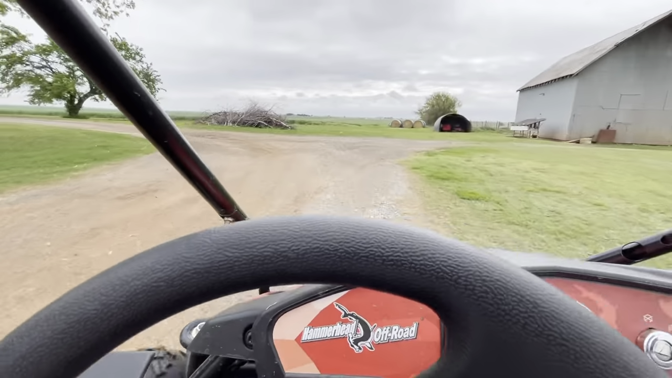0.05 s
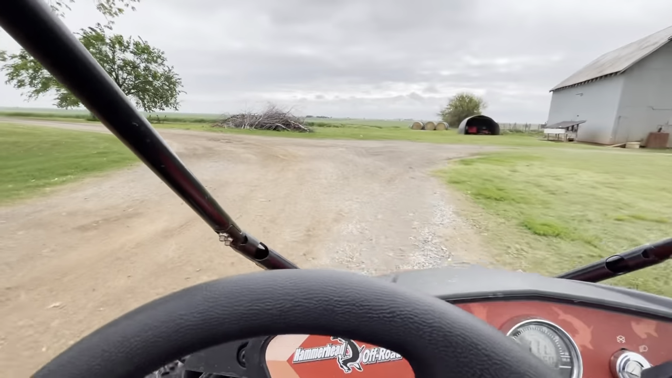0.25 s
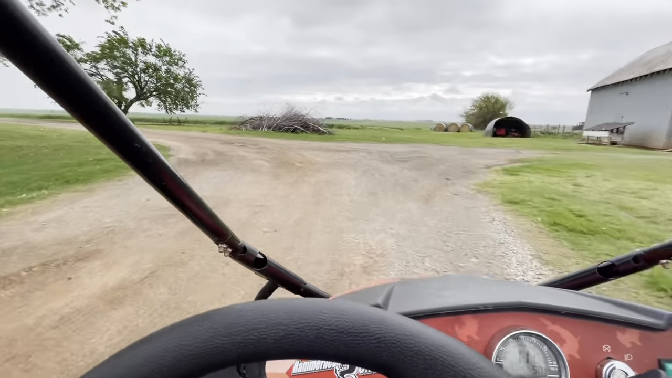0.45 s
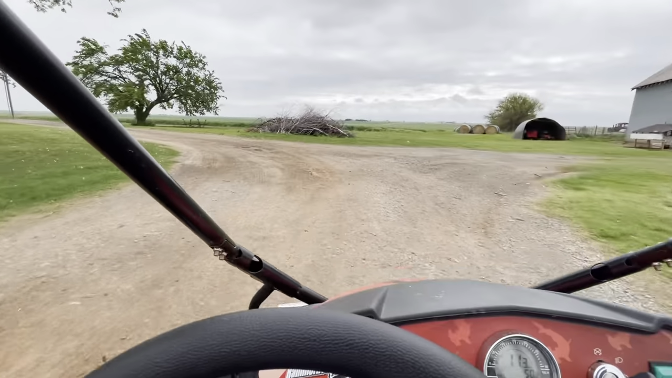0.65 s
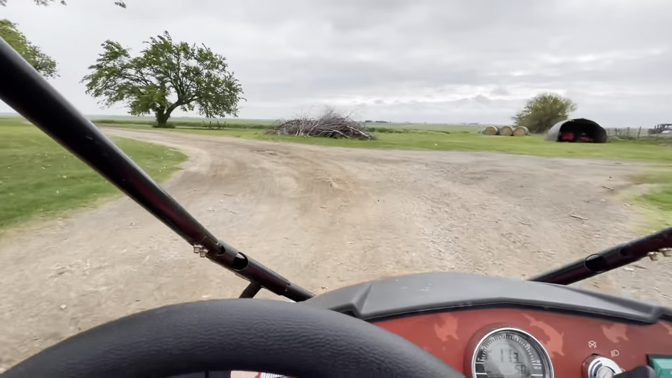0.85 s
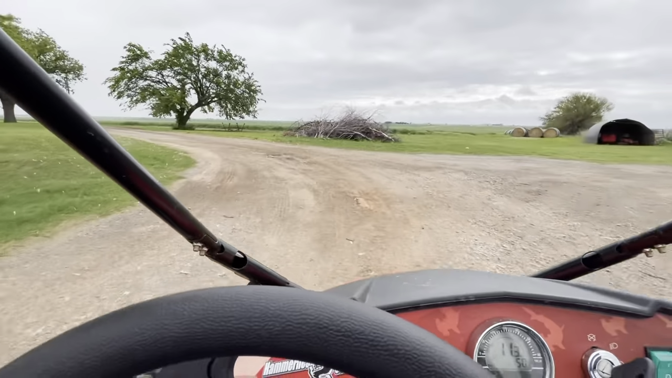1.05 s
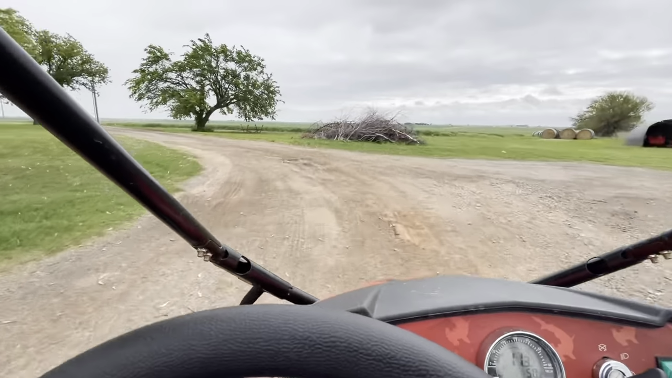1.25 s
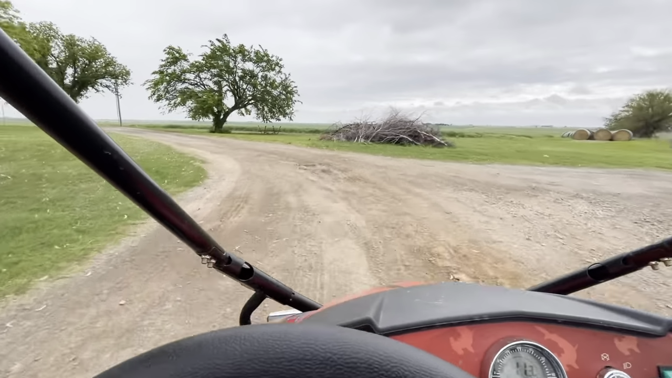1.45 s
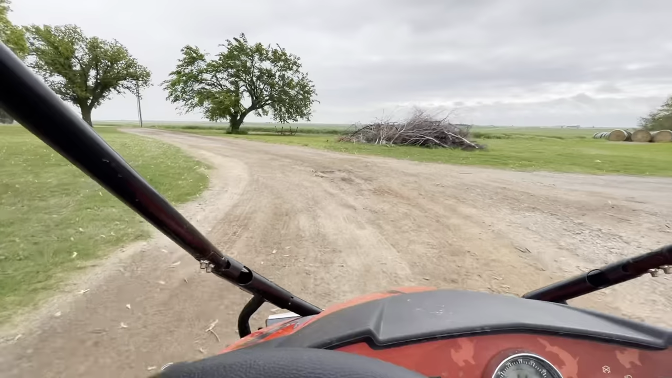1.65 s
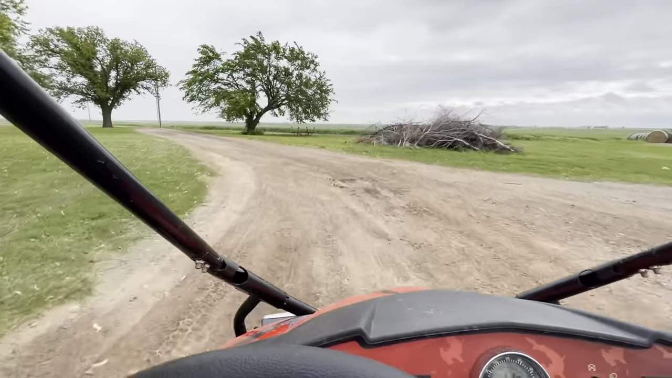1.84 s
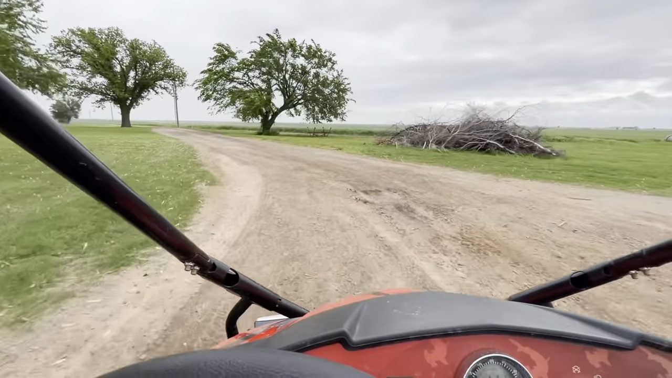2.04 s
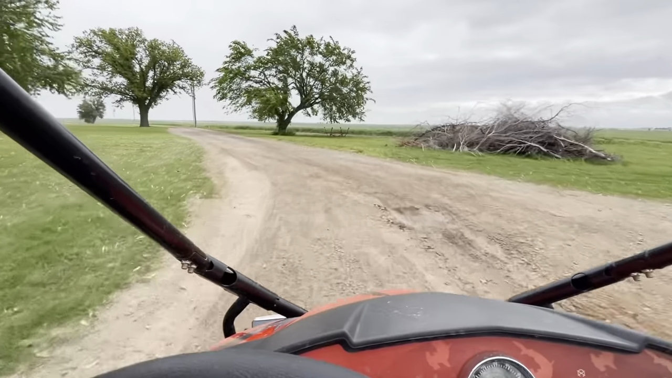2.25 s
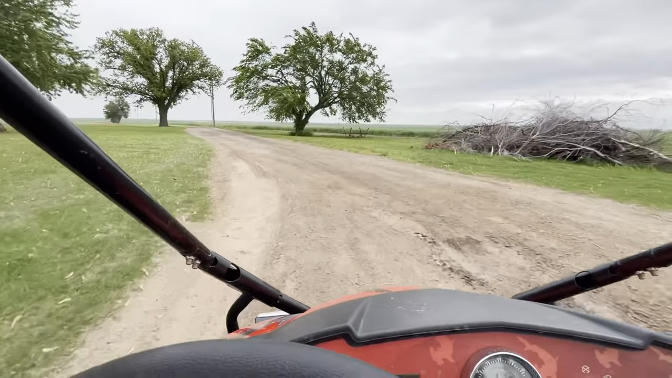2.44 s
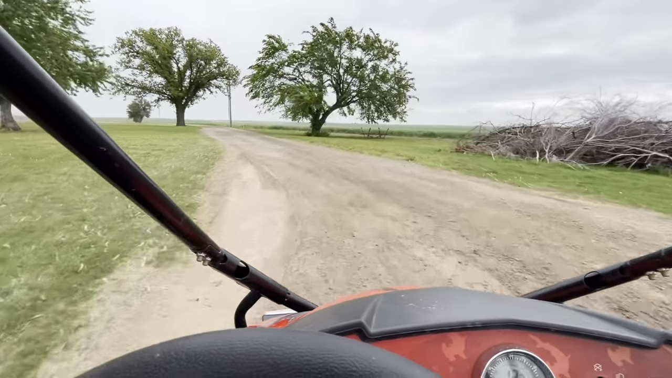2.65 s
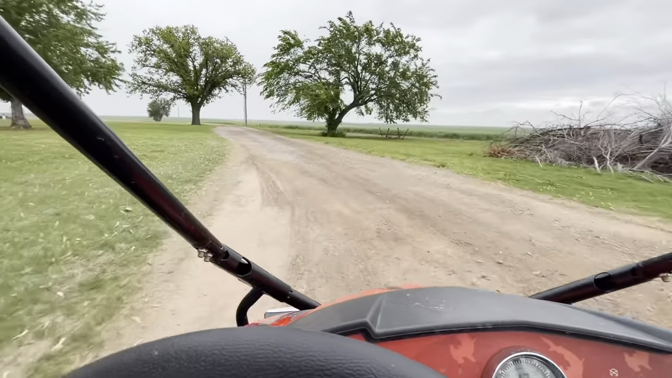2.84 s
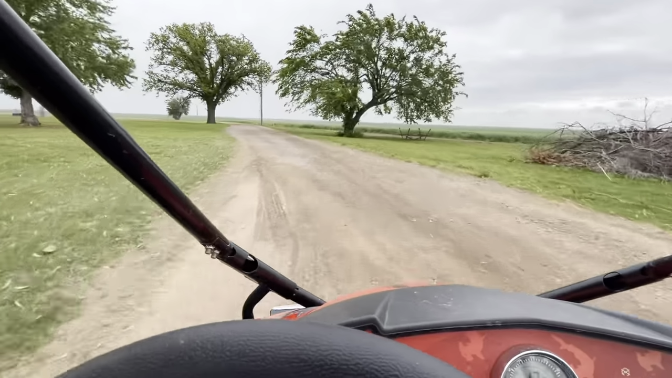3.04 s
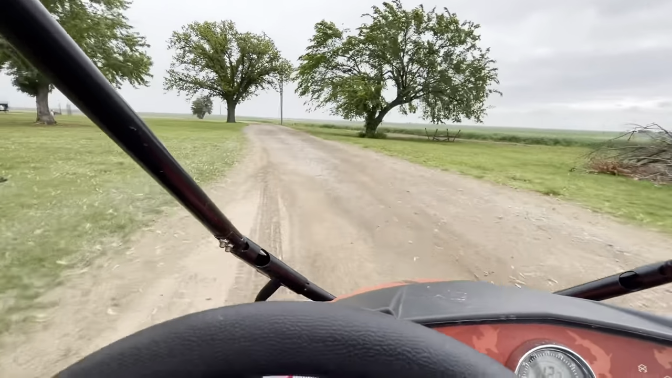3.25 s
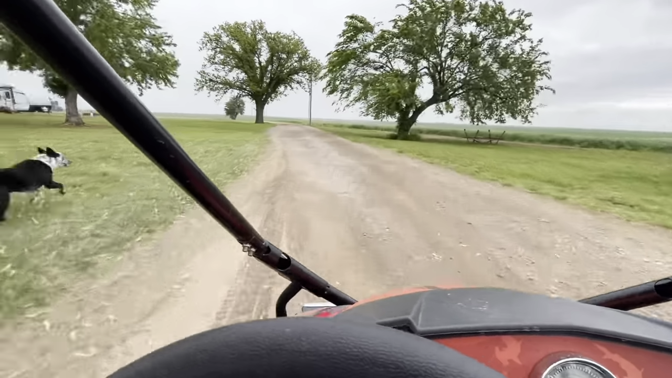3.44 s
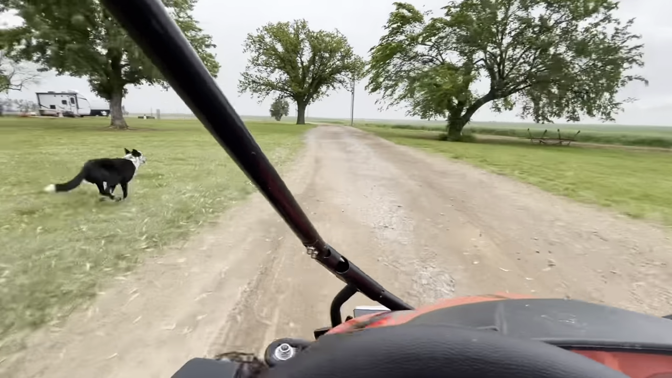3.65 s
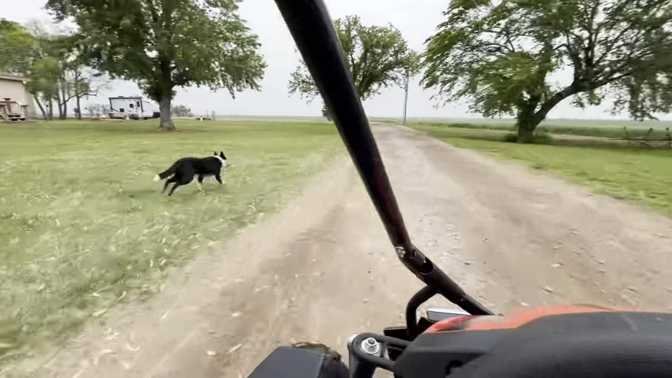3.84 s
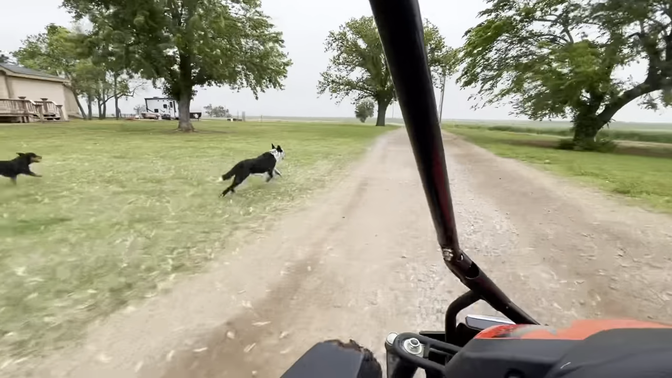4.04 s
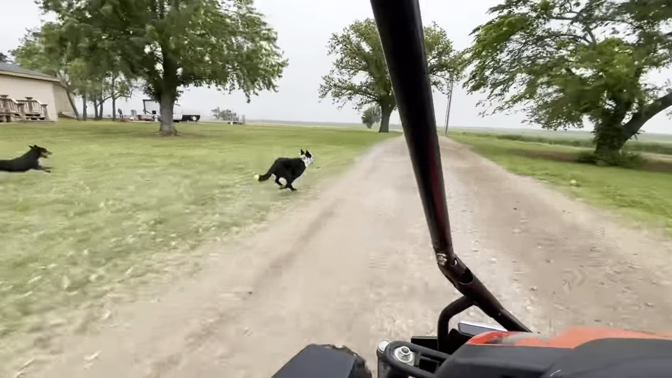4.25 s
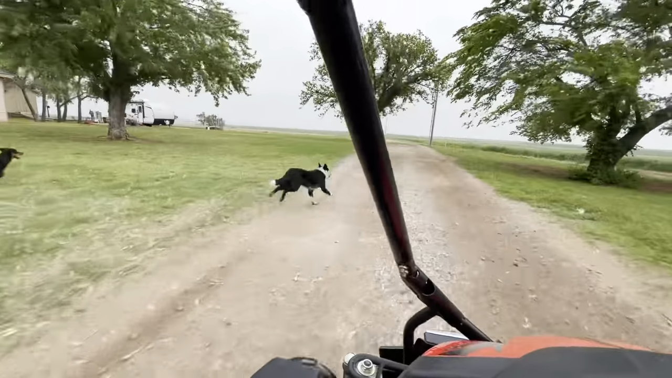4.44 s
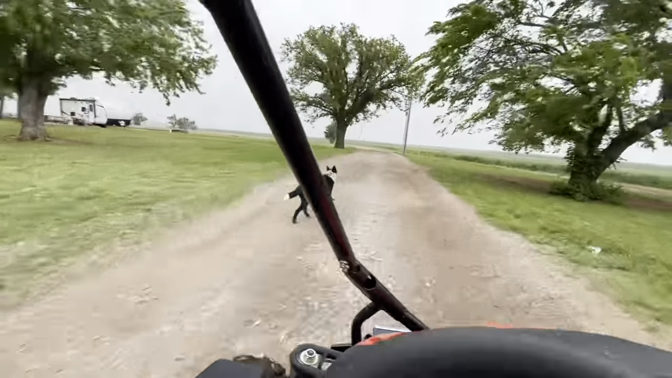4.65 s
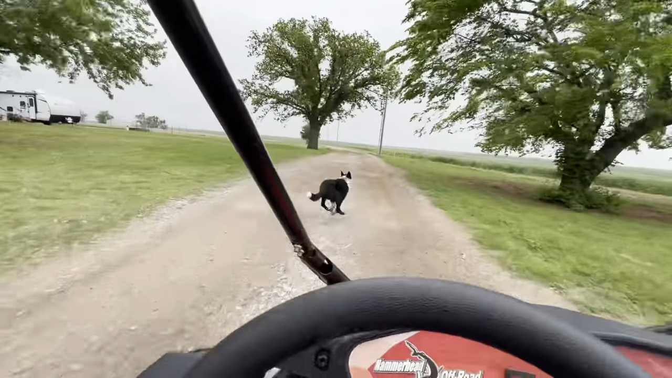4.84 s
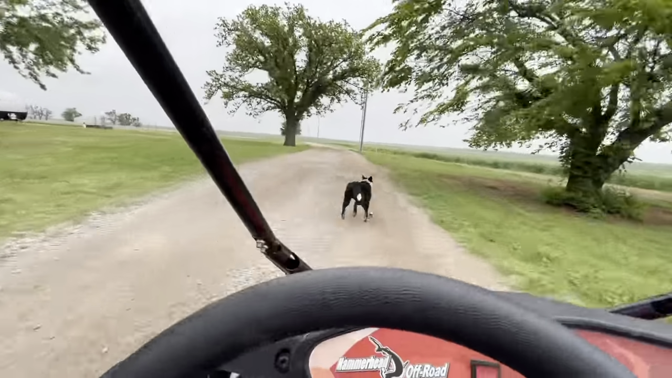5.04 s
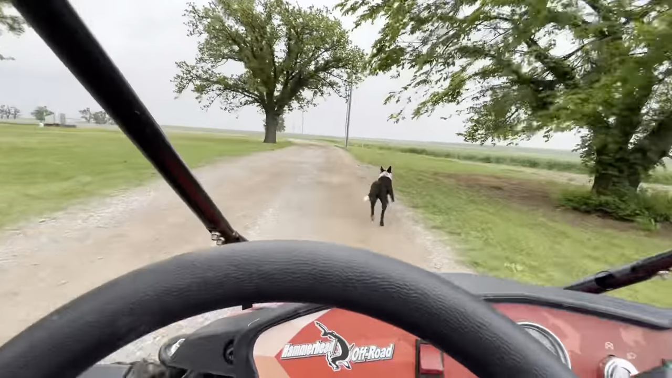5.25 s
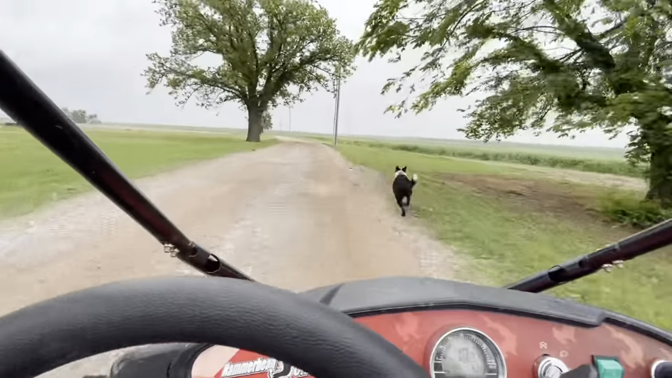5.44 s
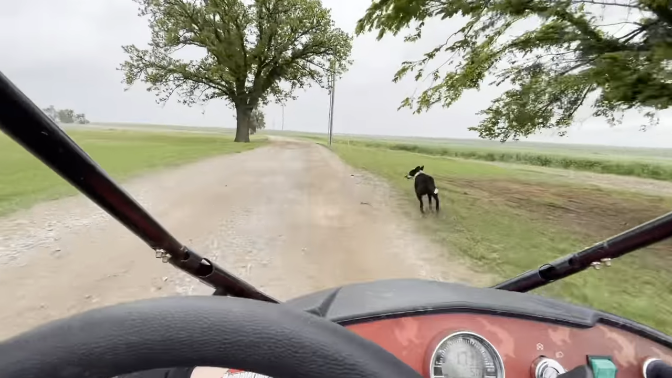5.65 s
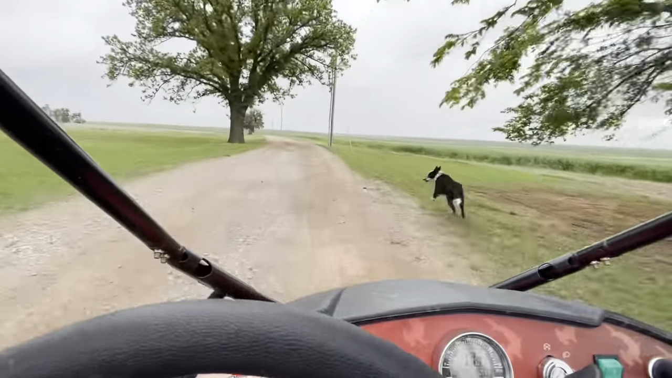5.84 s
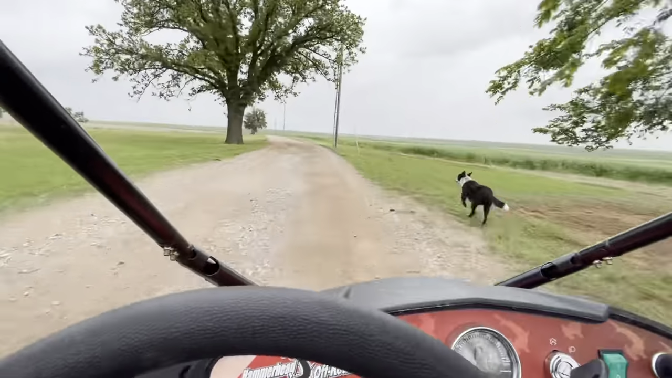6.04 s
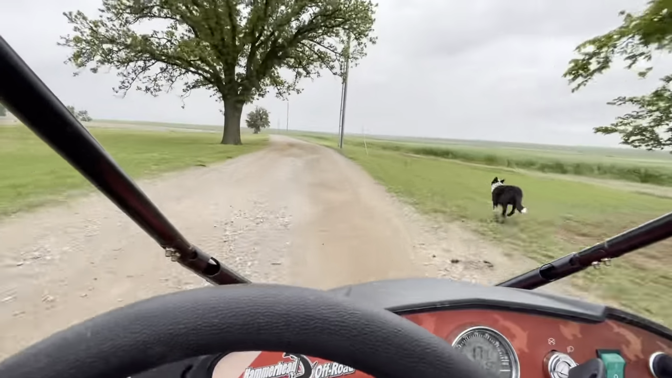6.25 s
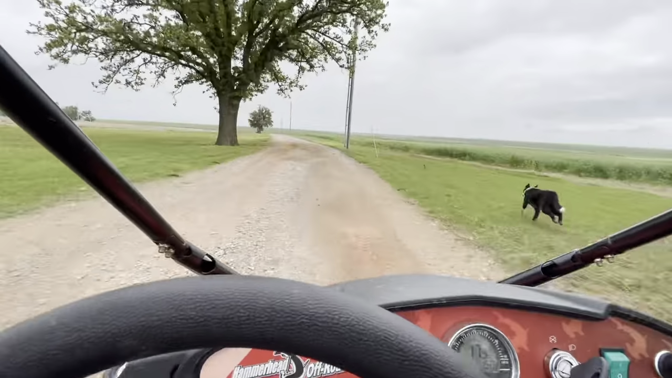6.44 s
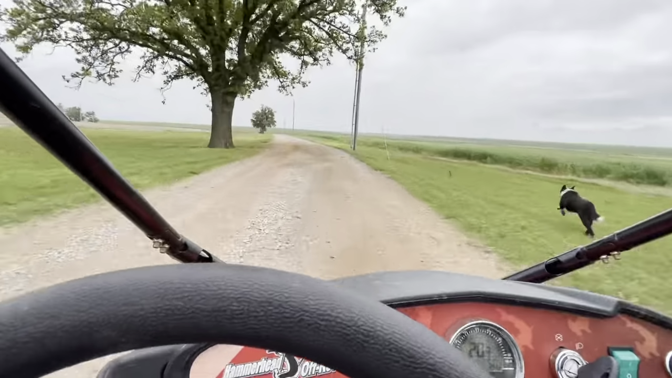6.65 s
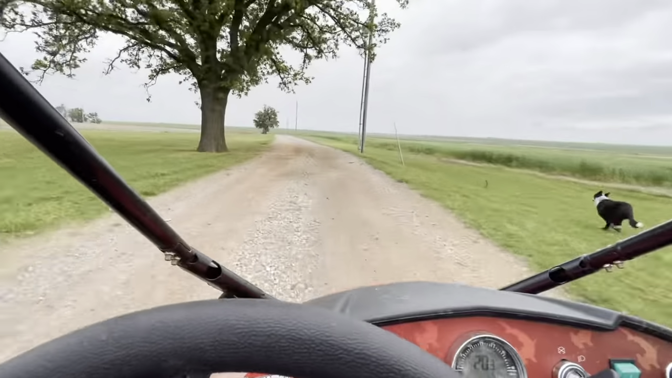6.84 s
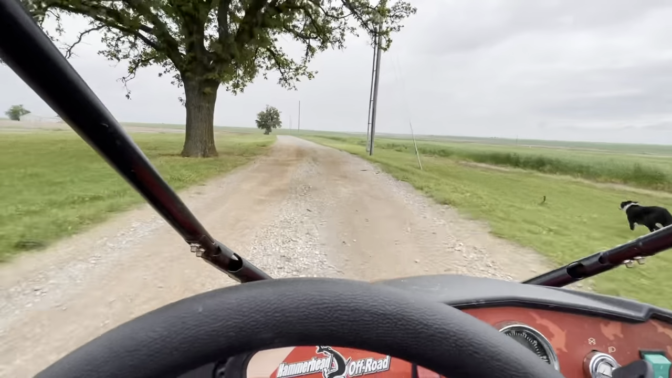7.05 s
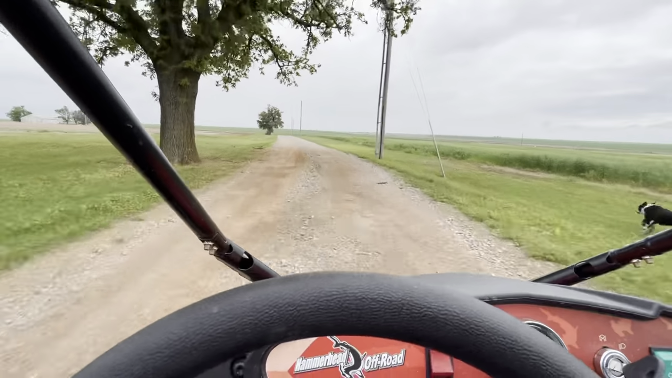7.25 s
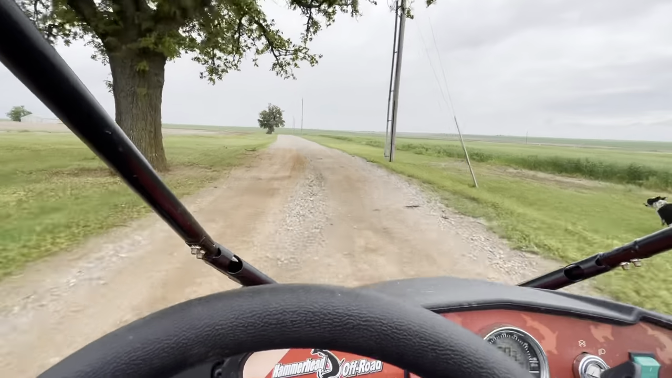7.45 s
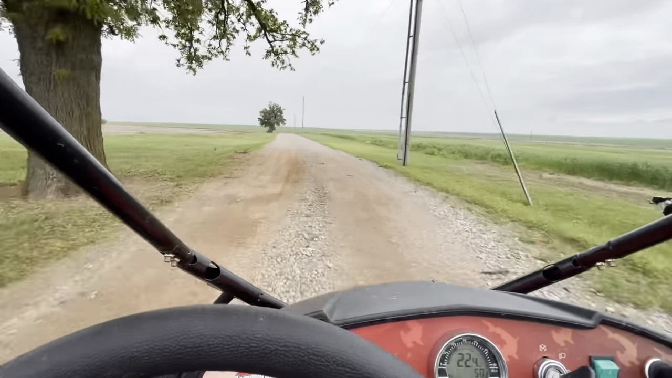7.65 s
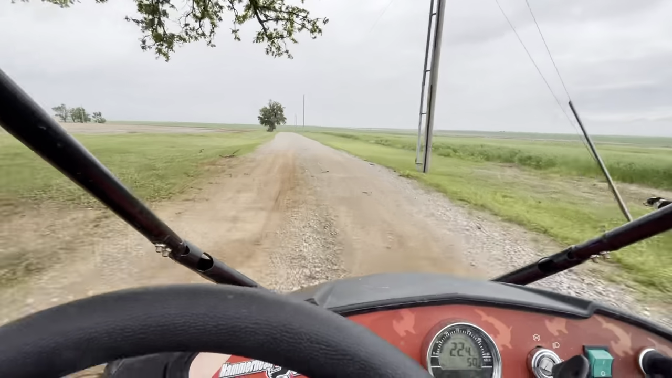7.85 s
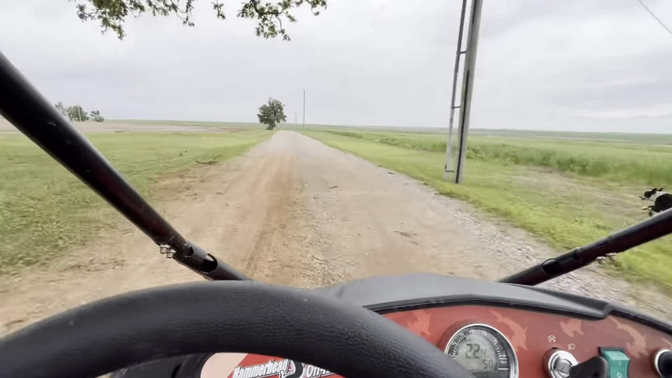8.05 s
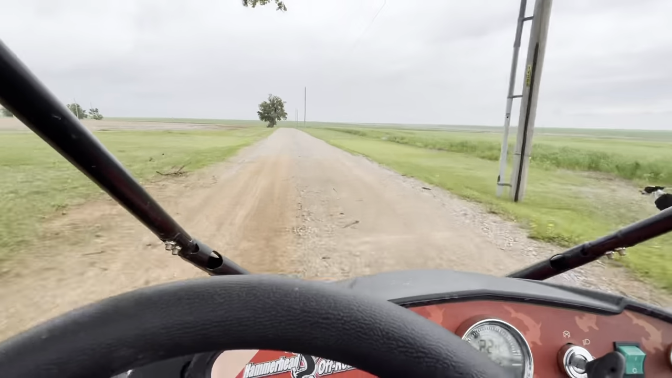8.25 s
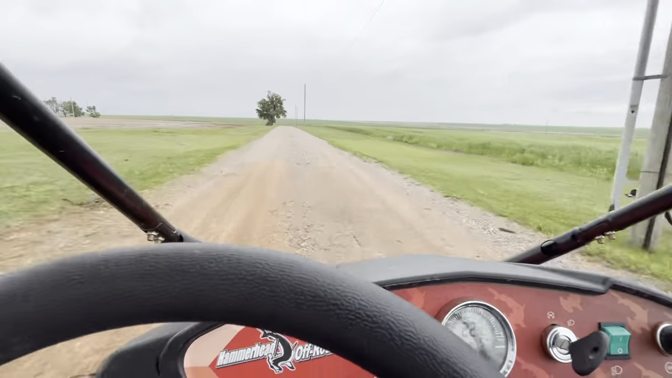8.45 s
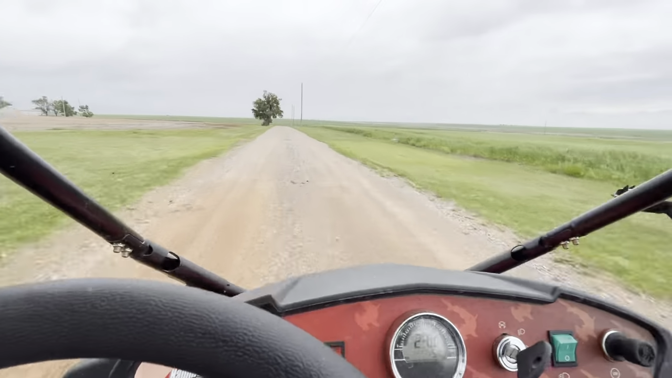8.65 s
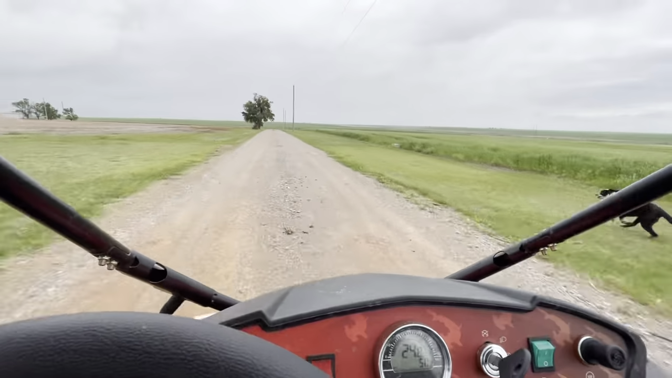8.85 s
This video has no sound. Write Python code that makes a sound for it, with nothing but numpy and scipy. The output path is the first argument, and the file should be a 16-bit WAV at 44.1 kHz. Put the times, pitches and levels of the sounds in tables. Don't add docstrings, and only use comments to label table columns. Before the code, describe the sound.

From the seat of a small open kart on a gravel farm road, a single-cylinder engine putters low, then pulls harder with a raspy, boomy exhaust. It drops off briefly midway, picks up again and holds a steady drone. Tyres crunch densely over stones, wind thumps and flutters on a hand-held phone's two ports, and loose metal knocks and jingles on bumps.

```python
import sys
import numpy as np
from scipy import signal
from scipy.fft import rfft, irfft, next_fast_len
from scipy.io import wavfile
from scipy.ndimage import uniform_filter1d

SR = 44100
rng = np.random.default_rng(int(sys.argv[2]) if len(sys.argv) > 2 else 0)


def field_ratio(decibels):
    return 10 ** (np.asarray(decibels, dtype=float) / 20)


def to_wav(sig):
    pcm = np.clip(np.atleast_2d(sig), -1, 1) * 32767
    pcm = np.round(pcm).astype(np.int16)
    wavfile.write(sys.argv[1], SR, pcm.T)


N = 392490
STEP = 64
FULL_DB = -11

# (t/s, firings per second/Hz, throttle as exhaust boom/dB, load as bark/dB)
DRIVE = [(0, 46.6, -23.5, -22.5), (1.7, 42.3, -23.5, -20.5), (2.3, 46.2, -19.5, -24),
         (2.69, 47.8, -10, -14), (2.9, 54, -10, -7.5), (3.18, 55.3, -9.5, -9), (3.6, 57, -11, -7.5),
         (4.16, 57.6, -12, -15.5), (4.47, 59.7, -16.5, -18), (4.72, 49.7, -29.5, -17.5),
         (4.98, 41, -34.5, -34.5), (5.2, 43.6, -20, -31), (5.48, 49.4, -8.5, -11.5), (5.68, 54.7, -11, -12),
         (6.2, 57, -12, -9.5), (6.75, 57.7, -13.5, -11), (7.65, 57, -13, -9.5), (8.9, 57.1, -13.5, -12)]


def rms_one(x):
    return x / np.sqrt(np.mean(x ** 2) + 1e-20)


def in_time(rows):
    s, *columns = np.transpose(rows)
    return [np.interp(np.arange(N) / SR, s, column) for column in columns]


def at_hz(points, hz):
    point_hz, point_db = np.transpose(points)
    return np.interp(np.log(hz), np.log(point_hz), point_db)


def fill(slow):
    ramp = np.arange(STEP) / STEP
    rise = np.diff(slow, append=slow[-1])
    return (slow[:, None] + rise[:, None] * ramp).ravel()[:N]


def drift(rate_hz):
    r = np.exp(-2 * np.pi * rate_hz * STEP / SR)
    chance = rng.standard_normal(N // STEP + 1001)
    settled = signal.lfilter([1], [1, -2 * r, r * r], chance)[1000:]
    return rms_one(settled)


def band(x, low_hz, high_hz):
    edges_hz = [low_hz, min(high_hz, .45 * SR)]
    return signal.sosfilt(signal.butter(2, edges_hz, "band", fs=SR, output="sos"), x)


def at_ports(x):
    # (f/Hz, left port ahead/rad)
    left_phase = [(0, 0), (520, -0.7), (1290, -0.6), (1550, -2.1), (2330, -2.3), (3100, -5.4), (3790, -6.4),
                  (6890, -13.0), (7490, -12.9), (8180, -15.5), (9730, -21.9), (10600, -22.0),
                  (11700, -25.0), (12400, -25.2)]
    size = next_fast_len(N)
    hz = np.arange(size // 2 + 1) * SR / size
    turn = np.exp(1j * np.interp(hz, *np.transpose(left_phase)))
    left = irfft(rfft(x[0], size) * turn, size)[:N]
    return np.array([left, x[1]])


def colour(spectrum, x, weight):
    # (f/Hz, width/Hz, lift/dB)
    panels = [(1027, 55, 4.5), (1636, 24, 4.5), (2177, 30, 5), (3004, 38, 3), (8230, 360, 6.5)]
    # (f/Hz, level/dB)
    balance = [(60, 5), (150, -7), (350, 0), (860, 0), (2080, 0.5), (5050, 8), (12200, 1.5)]
    # (f/Hz, share 0 to 1)
    likeness = [(100, .8), (400, .4), (1000, .6), (2500, .3), (5000, .25), (8500, .45), (9500, .95),
                (10700, .94), (11500, .8)]
    size = next_fast_len(N)
    hz = np.maximum(np.arange(size // 2 + 1) * SR / size, 10)
    panels_db = sum(db * np.exp(-((hz - centre_hz) / width) ** 2) for centre_hz, width, db in panels)
    tilt_db = at_hz(balance, hz) / 2 * np.array([[1], [-1]])
    alike = np.clip(at_hz(likeness, hz), 0, 1)
    gain = field_ratio(at_hz(spectrum, hz) + panels_db + tilt_db) * weight(alike)
    return irfft(rfft(x, size) * gain, size)[:, :N]


def wide_noise(spectrum, noise):
    shared = colour(spectrum, noise[0], np.sqrt)
    own = colour(spectrum, noise[1:], lambda alike: np.sqrt(1 - alike))
    return rms_one(at_ports(shared) + own)


def exhaust(cycle, rate, boom_db, bark_db):
    # (multiple of the firing rate, left level/dB, right level/dB, left port ahead/rad)
    orders = [(1, -15, -15, -0.1), (2, -2, 2, -0.2), (3, -17, -15, 0.4), (4, -15, -13, 0.5),
              (5, -24, -20, 0.2), (6, -22, -13, -0.1), (7, -20, -17, -0.1), (8, -22, -20, -1.6),
              (9, -21, -25, -1.1), (10, -32, -24, -1.7), (11, -24, -25, -0.9), (12, -24, -22, 0.3),
              (13, -24, -30, 1.5), (14, -25, -32, -2.8), (15, -25, -29, 2.8), (16, -30, -24, 0.1),
              (17, -20, -26, 0.8), (18, -28, -26, 0.2), (19, -26, -26, -0.8), (20, -26, -23, -1.2),
              (21, -30, -25, -0.3), (22, -27, -25, -0.3), (23, -28, -27, -0.8), (24, -31, -31, 1.0)]
    # (f/Hz, width/Hz, left lift/dB, right lift/dB)
    resonances = [(139.6, 23, 13, 9), (198.4, 15, -14, -24), (262, 14, 14.5, 7), (332.6, 10.7, 3, 7),
                  (393.8, 3.7, 9.5, 7.5), (469, 7.8, 9, 5), (522, 18, 4, 4), (639, 8, 4, 3.5),
                  (840, 11, 3, 2), (1246, 25, 1, 6)]
    t = np.arange(0, N, STEP) / SR
    thump_db = -32.5 + 0.61 * (boom_db - FULL_DB) + 0.95 * t + 2 * drift(3.0)
    firing_change = rng.standard_normal(N // STEP)[cycle[::STEP].astype(int)]
    uneven_db = 2 * uniform_filter1d(firing_change, size=4)
    ringing = np.clip(1 + 0.046 * (bark_db - FULL_DB), 0, 1)
    unsteady_db = 0.73 - 0.087 * (boom_db - FULL_DB)
    tones = np.zeros((2, N))
    for k, left_db, right_db, lead in orders:
        lift_db = ringing * sum(np.array([[l_db], [r_db]]) * np.exp(-((k * rate - hz) / width) ** 2)
                                for hz, width, l_db, r_db in resonances)
        if k == 1:
            level_db = thump_db + 12.5
        elif k == 2:
            level_db = boom_db - 1.6
        else:
            level_db = bark_db - 2.0 + 0.012 * k * (boom_db - 1)
        if k == 2:
            waver_db = unsteady_db * drift(6.9)
        else:
            waver_db = 1.84 * drift(4.4) + 2.5 * (k > 9) + uneven_db * (k > 8)
        smear = -.11 * k * k + .11 * max(k - 15, 0) ** 2
        phase = 2 * np.pi * k * cycle + smear + .014 * k * fill(drift(10))
        tones[0] += fill(field_ratio(left_db + level_db + waver_db + lift_db[0])) * np.sin(phase + lead)
        tones[1] += fill(field_ratio(right_db + level_db + waver_db + lift_db[1])) * np.sin(phase)
    return np.sqrt(2) * tones


def clatter(cycle, bark_db):
    # (f/Hz, level/dB per Hz)
    clatter_colour = [(150, 13.5), (300, 13), (600, 3), (850, 11.5), (1000, -1.5), (1200, 13.5), (1350, 2),
                      (1500, -5), (2000, -10), (3000, -3.5), (5000, -30), (9000, -20), (12000, -34),
                      (12500, -66)]
    level_db = -26 + 0.4 * (bark_db - FULL_DB) + 4.5 * drift(6.4)
    strength = field_ratio(3.8 * rng.standard_normal(N // STEP))[cycle.astype(int)]
    firing = 1.0 * strength * np.exp(-3.0 * (cycle % 1))
    valve = 0.7 * np.exp(-4.0 * ((cycle + .5) % 1))
    noise = rng.standard_normal((3, N)) * (0.83 + firing + valve)
    return fill(field_ratio(level_db - 1.5)) * wide_noise(clatter_colour, noise)


def engine():
    rate, boom_db, bark_db = [uniform_filter1d(curve[::STEP], size=40) for curve in in_time(DRIVE)]
    cycle = np.cumsum(fill(rate * (1 + .002 * drift(5)))) / SR
    return exhaust(cycle, rate, boom_db, bark_db) + clatter(cycle, bark_db)


def gravel():
    # (f/Hz, level/dB per Hz)
    stone_colour = [(300, 9.5), (1000, 12), (2000, 9), (3500, 0), (5500, -4), (7500, -6.5), (8600, -8),
                    (9800, -6.5), (10450, -4.5), (11000, -8.5), (11400, -9.5), (12300, -20), (12480, -75)]
    # (t/s, level/dB)
    road = [(0, 0), (.85, 0.5), (1.25, 2), (1.9, 0), (2.7, -0.5), (3.1, 2.5), (4.3, -3), (4.8, 0.5),
            (5.2, -4), (5.6, 0), (6.7, .5), (7.4, -0.5), (8.5, 0), (8.9, 0)]
    boom_db = in_time(DRIVE)[1]
    level_db = -30 + 0.34 * (boom_db - FULL_DB) + in_time(road)[0]
    hits = rng.random((3, N)) < 2500 / SR
    crunch = hits * field_ratio(2.3 * np.minimum(rng.exponential(1, (3, N)), 5))
    noise = rng.standard_normal((3, N)) * (1 + 0.64 * crunch) * fill(field_ratio(0.87 * drift(25.0)))
    return field_ratio(level_db + 8) * wide_noise(stone_colour, noise)


def gusts():
    # (t/s, left level/dB, right level/dB, deep part against fluttering part/dB)
    gust_table = [(.19, -14, -13.5, -7), (.42, -10, -15.5, -3), (.75, -18, -21, -4), (1.0, -22, -24, -1),
                  (1.16, -15.5, -20, -10), (1.42, -14, -22, -9), (1.68, -15, -20, -8),
                  (1.92, -20.5, -23, -6), (2.15, -18, -19, -7), (2.72, -25, -13.5, -10),
                  (2.98, -27, -8.5, -19), (3.25, -12, -13, -7), (3.55, -18, -12, -11),
                  (3.82, -6.5, -11.5, -16), (4.03, -7.5, -13, -10), (4.25, -10.5, -13, -6),
                  (4.47, -9, -16.5, 0.5), (4.8, -26, -33, -2), (5.7, -16, -13.5, -17),
                  (5.93, -20, -14, -13), (6.12, -7.5, -11, -9), (6.4, -17, -14, -16), (6.64, -30, -15, -14),
                  (6.88, -17, -12.5, -6), (7.101, -11.5, -12, -5), (7.5, -15, -14, -1.5),
                  (7.95, -16, -13, -4), (8.25, -10.5, -14, -7), (8.55, -12, -12, -7),
                  (8.82, -16, -14.5, -1.5)]
    s, left_db, right_db, deep_db = np.transpose(gust_table)
    half_length_s = 0.11
    bells = np.exp(-((np.arange(0, N, STEP) / SR - s[:, None]) / half_length_s) ** 2)
    peaks = field_ratio(np.array([left_db, right_db]))
    deep = field_ratio(-25.5) + (peaks * field_ratio(deep_db)) @ bells
    flutter = field_ratio(-30) + peaks @ bells
    return np.array([fill(g) for g in deep]), np.array([fill(g) for g in flutter])


def wind():
    # (t/s, peak level/dB, centre f/Hz, length/s, port: 0 left, 1 right)
    slaps = [(0.114, -9, 600, 0.0055, 1), (0.146, -4.5, 1500, .003, 1), (0.153, -4, 1300, 0.0053, 0),
             (0.234, -7, 1500, 0.0097, 0), (.338, -12, 700, 0.0076, 1), (0.197, -5, 900, 0.018, 0),
             (0.349, -7, 1000, 0.039, 0), (0.375, -13, 900, 0.033, 1), (0.468, -8, 900, 0.044, 0),
             (0.409, -7, 1600, 0.013, 0), (0.426, -3.5, 1420, 0.014, 0), (0.439, -2, 1500, 0.0055, 1),
             (0.441, -11, 1500, .008, 0)]
    deep, fluttering = gusts()
    lumps = field_ratio(2.6 * np.array([fill(drift(17.6)), fill(drift(27.0))]))
    buffet = deep * field_ratio(-2.5) * rms_one(band(rng.standard_normal((2, N)) * lumps, 44, 159))
    flutter_noise = band(rng.standard_normal((2, N)) * lumps, 160, 560)
    flutter = fluttering * field_ratio(-8) * rms_one(band(flutter_noise, 60, 1300))
    out = buffet - 0.24 * buffet[::-1] + flutter
    bursts = rng.standard_normal((len(slaps), 2048))
    for (s, db, hz, length_s, port), burst in zip(slaps, bursts):
        puff = band(burst * np.exp(-np.arange(2048) / SR / length_s), .4 * hz, 1.4 * hz)
        puff = band(puff, 100, 1.4 * hz)
        puff = band(puff, 60, 1.5 * hz)
        start = round(s * SR)
        out[round(port), start:start + 2048] += field_ratio(db) * puff / np.abs(puff).max()
    return out


def loose_metal():
    # (t/s, level/dB, length/s)
    shakes = [(.4, -54, 0.022), (.52, -39, 0.022), (.56, -40, 0.015), (1.15, -46, 0.053), (1.3, -54, 0.024),
              (1.4, -45, 0.012), (2.72, -29.5, 0.037), (2.77, -33, .03), (2.93, -33, 0.036),
              (3.47, -49, 0.059), (3.85, -48, .06), (4.5, -62, 0.024), (4.86, -43, 0.023),
              (5.03, -58, 0.019), (5.44, -39, 0.043), (5.62, -41, 0.043), (5.77, -40, 0.043),
              (5.86, -42, 0.041), (6.45, -46, 0.082), (8.2, -48, 0.029), (8.43, -43, .04),
              (8.701, -49, 0.027)]
    # (t/s, peak level/dB, f/Hz, left against right/dB)
    knocks = [(2.6529, -24, 8000, 1.0), (4.6721, -29, 7000, 3.0), (5.1543, -18, 11500, 2),
              (5.158, -22, 6000, 9), (5.3843, -13.5, 15130, 4), (5.4149, -24, 8000, -1),
              (5.733, -11, 8000, -9), (5.7366, -10.5, 6485, 1), (5.7404, -13, 8000, 15),
              (5.7465, -13, 7850, 8), (5.8237, -13.5, 7000, 4), (6.118, -21, 8000, 1.0),
              (6.3744, -18, 8000, 2), (6.6458, -19, 8000, 5)]
    # (f/Hz, level/dB, time to fade by 60 dB/s)
    metal_tones = [(6030, -10.5, 0.029), (6930, -13, 0.027), (7600, -14, .02), (8360, -6.5, 0.026),
                   (8630, -4, 0.027), (9580, -23, .02), (9550, -8.5, 0.035), (11260, 4, 0.021),
                   (11600, 6.5, 0.05), (11500, -11, 0.015), (11800, -17.5, 0.013), (12000, -23, .02)]
    t = np.arange(0, N, STEP) / SR
    swells = sum(field_ratio(db) * np.exp(-((t - s) / length_s) ** 2) for s, db, length_s in shakes)
    shaken = fill(field_ratio(-54.5) + swells)
    touches = (rng.random(N) < 900 / SR) * rng.standard_normal(N) * shaken * field_ratio(-1.5)
    rings, cracks = np.zeros((2, N)), np.zeros((2, N))
    fade = field_ratio(-60 * np.arange(2048) / SR / .015)
    spread = 1.44
    bursts = rng.standard_normal((len(knocks), 2048))
    for (s, db, hz, pan_db), burst in zip(knocks, bursts):
        crack = band(burst * fade, hz / spread ** 1.21, hz * spread)
        start = round(s * SR)
        cracks[:, start:start + 2048] += field_ratio(db + pan_db / 2 * np.array([[1], [-1]])) * crack
    struck = touches + field_ratio(-22) * cracks + 1e-18
    for hz, db, t60 in metal_tones:
        r, w = field_ratio(-60 / (t60 * SR)), 2 * np.pi * hz / SR
        rings += field_ratio(db) * signal.lfilter([0, np.sin(w)], [1, -2 * r * np.cos(w), r * r], struck)
    rings = signal.sosfilt(signal.cheby2(10, 50, 12450, fs=SR, output="sos"), rings)
    return at_ports(rings + field_ratio(4.5) * cracks)


def scene():
    return engine() + gravel() + wind() + loose_metal()


def low_pass(x):
    return signal.sosfilt(signal.butter(12, 12850, fs=SR, output="sos"), x)


def record(dry):
    x = signal.sosfilt(signal.butter(3, 46, "high", fs=SR, output="sos"), dry)
    x = x / (1 + (x / .97) ** 4) ** .25
    return low_pass(x)


dry = scene()
out = record(dry)
to_wav(out)
```